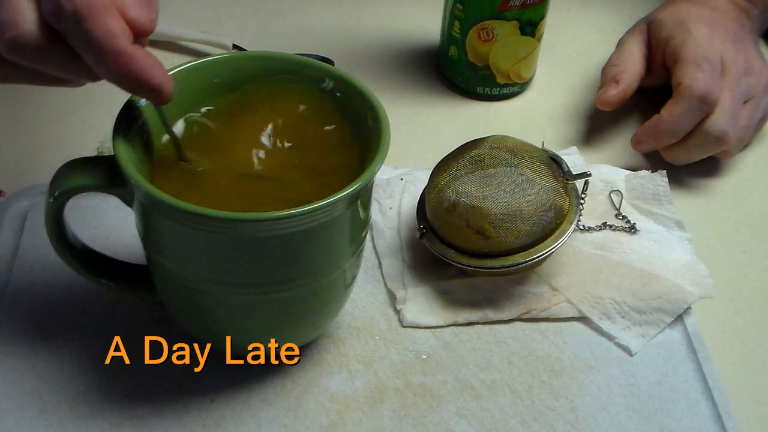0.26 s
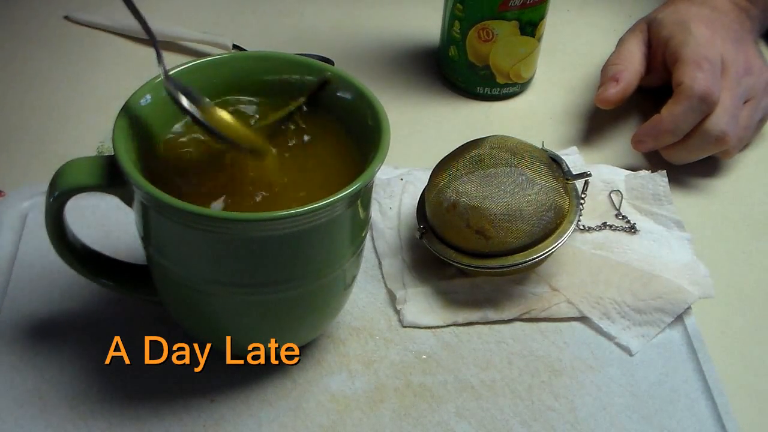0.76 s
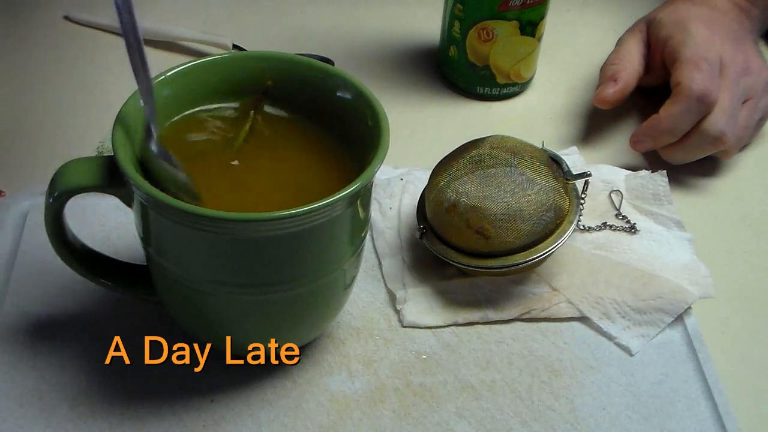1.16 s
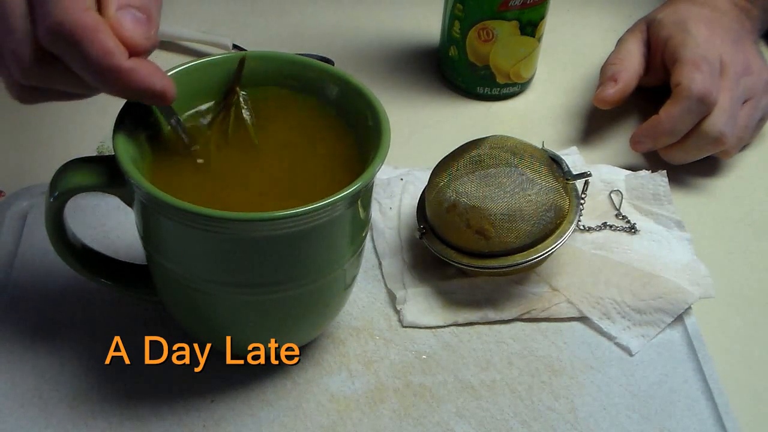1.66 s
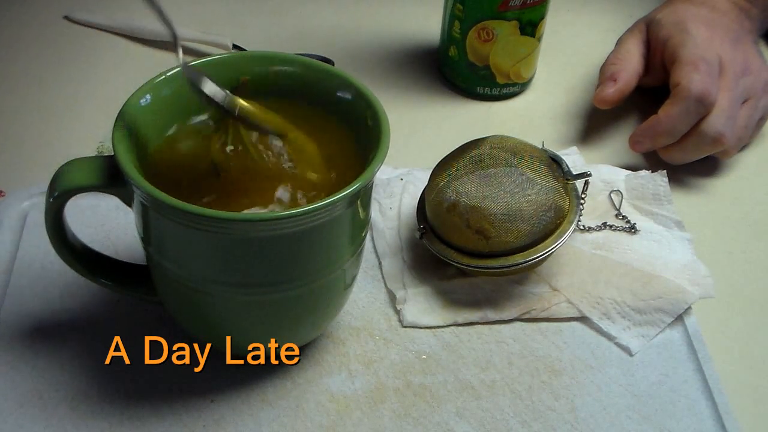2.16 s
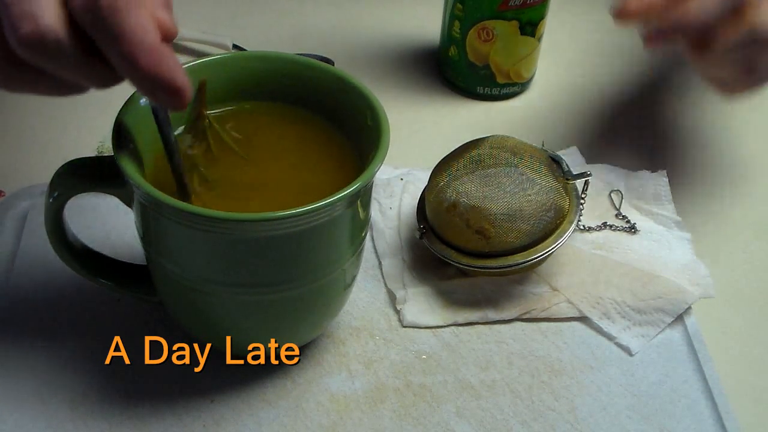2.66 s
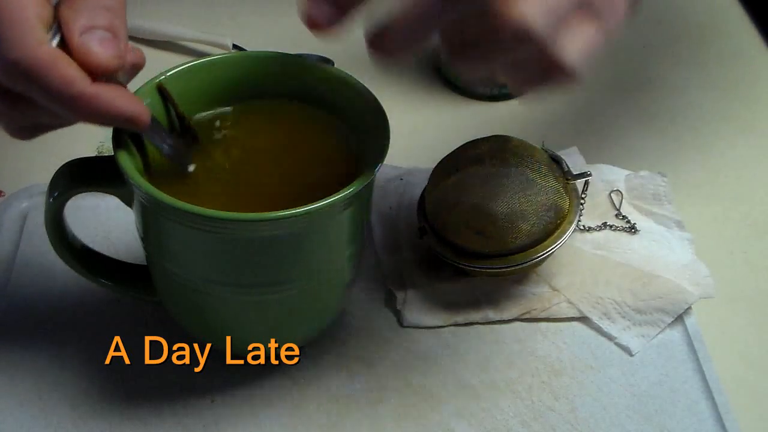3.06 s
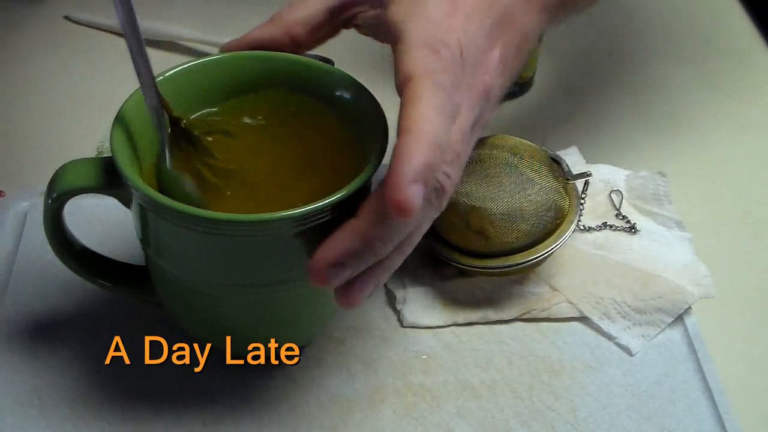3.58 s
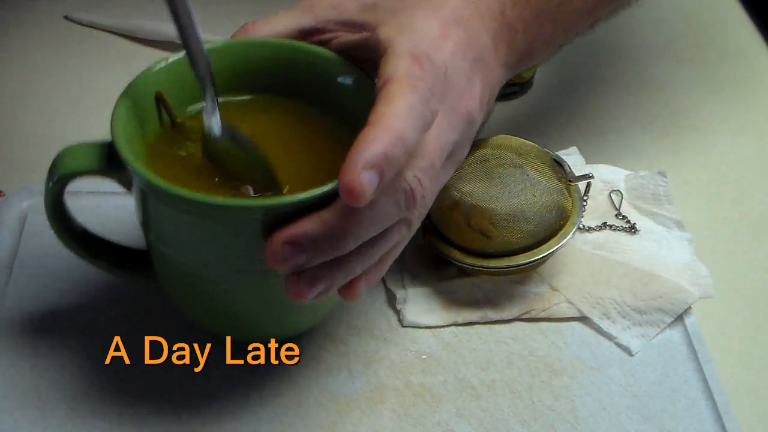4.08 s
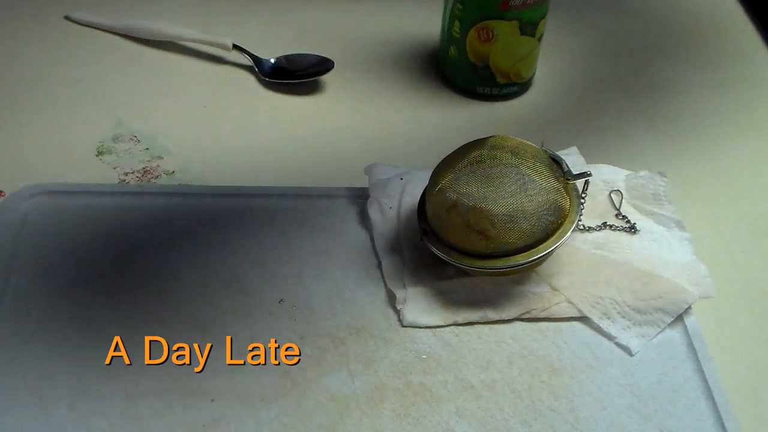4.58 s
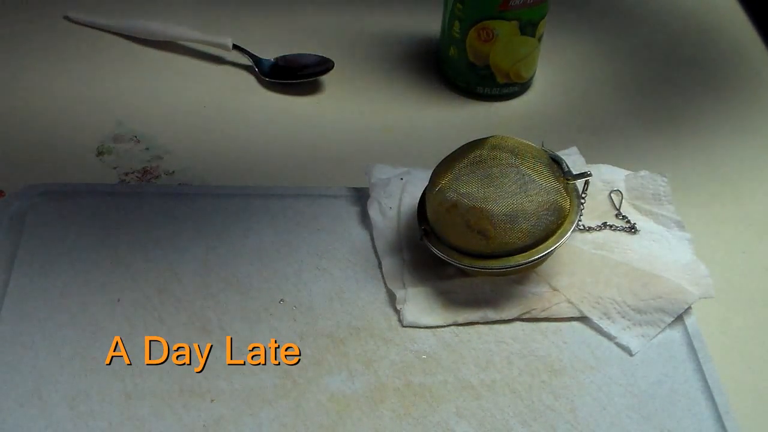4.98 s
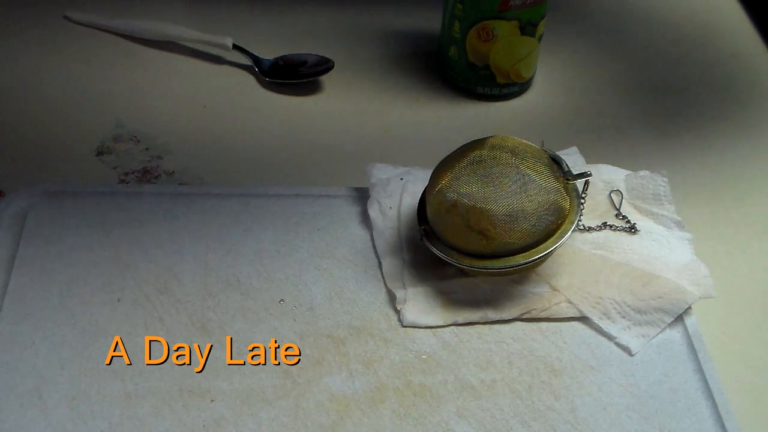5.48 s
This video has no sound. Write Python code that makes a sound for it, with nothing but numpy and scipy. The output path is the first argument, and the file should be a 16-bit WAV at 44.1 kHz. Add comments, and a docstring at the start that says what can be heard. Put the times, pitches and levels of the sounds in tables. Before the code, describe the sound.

Close in a small kitchen, a steel teaspoon softly scrapes the bottom of a ceramic mug of tea, with little watery blips. Sparse clinks ring out, then a tight cluster as the mug is lifted. After a pause the spoon hits the rim brightly and rattles briefly. Low rumble, hiss and faint hum lie underneath; a stereo microphone nearby dips in level after the hardest hits.

```python
"""On a kitchen counter, a steel teaspoon stirs tea in a ceramic mug: it scrapes and clinks, and bubbles tick.
The mug is carried off; the spoon drops against the rim and rattles. Clinks are decaying modes plus noise
bursts, scrapes are random slips through resonances, bubbles are rising sines. A small room answers, a rumble,
hiss and hum lie beneath, and a gain control ducks the sound after the hardest clinks."""
import sys
import numpy as np
from scipy import signal
from scipy.fft import rfft, irfft, next_fast_len
from scipy.io import wavfile
from scipy.ndimage import uniform_filter1d, minimum_filter1d, map_coordinates

SR = 44100
rng = np.random.default_rng(int(sys.argv[2]) if len(sys.argv) > 2 else 0)


def generate_wav(signal):
    """Clip the signal to [-1, 1] and save it as 16-bit WAV at the path in sys.argv[1]."""
    frames = np.transpose(np.atleast_2d(signal))
    scaled = np.clip(frames, -1, 1) * 32767
    pcm = np.round(scaled).astype(np.int16)
    wavfile.write(sys.argv[1], SR, pcm)


N = 252693  # length in samples

# Spoon meets mug. Each row: start in seconds, crack level in dB, hardness as spectral tilt in dB per octave,
# click level in dB, mug ring level in dB, angle from the handle in degrees, extra level of the upper mug
# rings in dB, spoon level through its bowl in dB, spoon level through its stem in dB.
CONTACTS = [ (0.001, -48, -8, -68, -80, 29, 6, -47, -79), (0.0408, -44, -5.5, -57, -77, 8.5, -12, -55, -66),
            (0.2579, -44.5, 4.5, -46, -43, 29, -38, -51, -70),
            (1.3380, -29, 1.5, -17.5, -35.5, 20, 1, -48, -60),
            (1.5624, -36.5, 1, -49, -43.5, 25, -12.5, -61, -60),
            (2.8316, -30.5, 4, -38, -38.5, 55.5, 0, -52, -60),
            (3.9538, -35.5, 6, -45, -34.5, 32, 1, -26.5, -42),
            (3.964, -26.5, 6, -40, -29, 16, -12, -36, -54), (3.9875, -24, 2.5, -27, -32, 40, -4, -22, -53),
            (4.93, -19, 5, -21, -25.5, 31, -28, -48, -25),
            (5.3564, -38, -6.5, -41, -41.5, 2, -9.5, -54.5, -75)]
# The spectrum of the crack before the tilt. Each row: frequency in Hz, relative level in dB.
CRACK_SPECTRUM = [(300, -78), (1000, -31), (1700, 18), (2400, 6), (3500, 9.5), (4700, 10.5), (6500, -3.5),
                  (8500, 7), (10000, -3), (12200, 7), (14000, -14)]
# The mug's foot. Each row: resonance in Hz, width in Hz, relative level in dB.
FOOT_MODES = [(554, 146, 2.5), (722, 170, -3), (1180, 230, 0.5)]
# The spot that is hit rings very briefly. Each row: frequency in Hz, relative level in dB, t60 in seconds.
CLICK_MODES = [(1800, -3, 0.013), (5940, -2, 0.0045), (12150, -3, 0.0098)]
# The mug's wall rings in close pairs.
# Each row: frequency in Hz, relative level in dB, t60 in seconds (ungripped), left over right in dB.
WALL_MODES = [(1700, 0, .42, 0), (1797, 0, .62, 0), (4366, -2, .38, -2.5), (4610, -3, .37, -3.5)]
# One entry for each wall mode: number of waves round the rim.
RIM_WAVES = [2, 2, 3, 3]
# The spoon's modes. Each entry: frequency in Hz.
SPOON_MODE_HZ = [1915, 3583, 4465, 4655, 4764, 5520, 5598, 7672, 7790, 8206, 8488, 8545, 8775, 8856, 9738,
                 11825, 12004, 12253]
# One row for each spoon mode: relative level in dB when struck on the bowl, the same when struck on the stem,
# t60 in seconds, left over right in dB.
SPOON_MODES = [(-64, -33, 0.23, -11), (-42, -12, 0.25, 0), (-50, -9, 0.27, -6), (-13.5, -32, 0.25, -7),
               (-28, -32, 0.36, 2), (-70, -5, 0.23, -7), (-1.5, -4.5, 0.18, -1), (-19.5, -32, 0.36, -13),
               (-16, -47, 0.24, 11), (-38, -15, 0.32, 1), (-13, -16, 0.14, 14), (-18, -25, 0.12, -19),
               (-18.5, -23, 0.073, 17), (-11.5, -9, 0.18, -2), (-18, -6, 0.12, -1), (-22, -26, 0.15, 6),
               (-24, -27, 0.11, 10), (-31, 4, 0.083, -3)]
# Short dull bursts of noise: light touches, and the coloured onsets of some clinks.
# Each row: start in seconds, level in dB at onset, centre in Hz.
DULL_BURSTS = [(0.0397, -44.5, 3300), (0.111, -47, 6340), (1.257, -44.5, 2210), (1.562, -36.5, 3800),
               (2.7803, -46, 1630), (3.459, -50.5, 1800), (3.8785, -53.5, 4680), (3.965, -28, 4200),
               (4.494, -42, 1880), (5.3556, -42.5, 2100), (5.3705, -51, 2400), (5.480, -55, 930)]
# The mug's rings while the spoon leans on it.
# Each row: mean frequency in Hz, mean relative level in dB, t60 in seconds.
LEANING_MODES = [(1670, -4, 0.17), (1800, 1.5, 0.086), (1885, -1.5, 0.057), (3800, -13, 0.062)]
# Sweeps over the mug's bottom. Each row: time of firmest pressure in seconds, relative level in dB,
# swell in seconds, pitch of the rub in Hz.
SWEEPS = [(0.075, -54, 0.069, 2670), (0.187, -59, 0.021, 3900), (0.379, -53, 0.043, 3000),
          (0.488, -63, 0.021, 3900), (0.592, -58, 0.048, 1920), (1.73, -61, 0.036, 2110),
          (1.85, -72, 0.01, 1200), (1.97, -56, 0.027, 1350), (3.12, -63, 0.073, 1210)]
# The mug's bottom. Each row: resonance in Hz, width in Hz, mean relative level in dB.
BOTTOM_MODES = [(579, 97, 5), (1270, 65, 1.5), (1630, 216, -2.5), (1990, 235, -1), (3825, 370, -4.5),
                (5350, 320, -9), (7700, 2400, -13.5)]
# Short rising tones: bubbles, drips and the 2 kHz swish of two sweeps.
# Each row: start in seconds, level in dB, starting pitch in Hz, t60 in seconds.
RISING_TONES = [(0.064, -49, 3650, 0.052), (0.1097, -38.5, 1430, 0.035), (0.163, -43, 1487, 0.049),
                (0.207, -49.5, 3670, 0.044), (0.582, -45.5, 1990, 0.072), (1.715, -50, 2050, 0.098),
                (2.4621, -40, 3190, 0.024), (3.881, -51, 1500, 0.068)]
# Soft bumps on the counter. Each row: centre in seconds, relative level in dB, spread in seconds.
HAND_BUMPS = [(2.84, -57, 0.056), (3.88, -59.5, 0.031), (3.992, -53.5, 0.04)]
# The room's decay. Each row: frequency in Hz, t60 in seconds.
ROOM_DECAY = [(300, 1), (2000, 0.62), (6000, 0.55), (13000, 0.31)]
# Steady noise before its low cut. Each row: frequency in Hz, relative level in dB per Hz.
FLOOR_SPECTRUM = [(12, -24), (20, -13), (39, -5.5), (71, -13.5), (86, -16), (114, -14.5), (145, -20),
                  (351, -24), (561, -27), (1740, -30.5), (2550, -32), (2780, -31), (3100, -32.5),
                  (13300, -36.5), (14500, -35)]
# Likeness of the two ears in that noise. Each row: frequency in Hz, left-right correlation from 0 to 1.
EAR_LIKENESS = [(60, 0.18), (180, 0.28), (540, 0.078), (1630, 0.18), (4880, 0.011), (14700, 0.01)]
# A kitchen appliance. Each row: frequency in Hz, mean level in dB.
APPLIANCE_HUM = [(29.8, -57), (59.5, -68.5)]

KNOCK_DB = -8  # the knock against the crack, for an untilted blow
KNOCK_LOSS = 1.1  # dB lost per dB/octave of tilt, so hard blows knock less
LIFT_S, LIFTED_KNOCK_DB = 4.3, -21.5  # the mug leaves the counter and its knock weakens
GRIP_FROM_S, GRIP_DAMPING = 3.5, 0.61  # in the hand, the mug's lowest rings last only this share as long
RATTLE_S, RATTLE_DB, RATTLE_FADE_DB_PER_S = 5.357, -43.5, 68
ROCK_S, ROCK_SCATTER_S = 0.0205, 0.004  # from one bounce to the next, and its random spread
EASE_SHARE, PRESS_EDGE = 0.52, 1.85  # a sweep lets go in this share of its swell; steepness of its flanks
RUB_FALL_DB_PER_OCT = 4  # a sweep excites less the farther from its pitch
LAP_FROM_S, LAP_TO_S = 0.9, 3.9
LAP_DB, LAP_HZ = -59, 2900  # loudest tick and middle pitch
TOP_HZ = 14050  # upper band limit


def amp(db):
    """Amplitude ratio that corresponds to a level in decibels."""
    return 10 ** (np.asarray(db) / 20)


def unit(x):
    """Normalization to unit root-mean-square."""
    return x / np.sqrt(np.mean(x ** 2) + 1e-20)


def along(points, hz):
    """Linear interpolation of (Hz, value) points on a logarithmic frequency axis."""
    f, v = np.transpose(points)
    return np.interp(np.log(hz + 1), np.log(f + 1), v)


def filtered(x, response):
    """Linear filtering: the spectrum is multiplied by a complex response of frequency."""
    n = x.shape[-1]
    m = next_fast_len(n + 8192)
    return irfft(rfft(x, m) * response(np.fft.rfftfreq(m, 1 / SR)), m)[..., :n]


def resonance(hz, centre, width):
    """Frequency response of one damped, causal resonator."""
    return 1j * hz * width / (centre ** 2 - hz ** 2 + 1j * hz * width)


def wobble(rate):
    """Slow random fluctuation: a smooth curve through a given number of random knots a second."""
    return map_coordinates(rng.standard_normal(int(N * rate / SR) + 4), [np.arange(N) * rate / SR])


def noise(size, colour, width):
    """Coloured stereo noise of unit rms; width weighs the side against the mid signal."""
    mid, side = filtered(rng.standard_normal((2, size)), colour)
    return unit(np.array([mid + width * side, mid - width * side]))


def add(track, s, sound):
    """Superposition: a sound is added to the stereo track from time s."""
    start = max(round(s * SR), 0)
    track[:, start:start + sound.shape[-1]] += sound[..., :N - start]


def strikes():
    """Impact excitation: a click, a crack of dense short modes and a knock through the counter."""
    out, t = np.zeros((2, N)), np.arange(SR // 3) / SR

    def foot(hz):
        return sum(amp(db) * resonance(hz, centre, width) for centre, width, db in FOOT_MODES)

    for s, crack_db, tilt_db, click_db, *_ in CONTACTS:
        def colour(hz):
            return amp(along(CRACK_SPECTRUM, hz) + tilt_db * np.log2((hz + 500) / 5000))

        # the crack comes straight from the mug; its faint tail is scattered by the things on the counter
        crack = noise(len(t), colour, width=0.2) * amp(-60 * t / 0.045)
        scatter = noise(len(t), colour, width=0.34) * amp(-15.5 - 60 * t / 0.27)
        add(out, s, amp(crack_db) * (crack + scatter))
        knock_db = crack_db + KNOCK_DB - KNOCK_LOSS * tilt_db + LIFTED_KNOCK_DB * (s > LIFT_S)
        knock = noise(len(t), foot, width=0.17) * amp(-60 * t / 0.065)
        add(out, s, amp(knock_db) * knock)
        click = sum(amp(db - 60 * t / t60) * np.cos(2 * np.pi * hz * t) for hz, db, t60 in CLICK_MODES)
        add(out, s, amp(click_db) * click)
    return out


def ring(t, hz, t60, pan_db, attack=0.00053):
    """Exponentially decaying mode; a close companion tone makes it beat, as tea and spoon move."""
    ears = np.array([[.5], [-.5]])
    # the phase between the ears grows with frequency
    phase = rng.uniform(0, 2 * np.pi) + ears * hz / 8000 * rng.choice([-1, 1])
    beat_hz = np.sqrt(hz) * rng.uniform(0.12, 0.37) * rng.choice([-1, 1])
    companion_phase = phase + rng.uniform(0, 2 * np.pi)
    companion = np.sin(2 * np.pi * (hz + beat_hz) * t + companion_phase)
    tone = np.sin(2 * np.pi * hz * t + phase) + 0.41 * (1 - np.exp(-t / 0.0026)) * companion
    return amp(ears * pan_db - 60 * t / t60) * tone * (1 - np.exp(-t / attack))


def rings():
    """Modal superposition: every contact excites the modes of the mug's wall and of the spoon."""
    out, t = np.zeros((2, N)), np.arange(SR * 3 // 4) / SR
    for s, *_, mug_db, angle, upper_db, bowl_db, stem_db in CONTACTS:
        for k, ((hz, db, t60, pan_db), waves) in enumerate(zip(WALL_MODES, RIM_WAVES)):
            # the place of the blow shares the energy between the twins of a pair
            share = np.cos(waves * np.radians(angle) - k % 2 * np.pi / 2)
            life = t60 * (GRIP_DAMPING if s > GRIP_FROM_S and waves == 2 else 1)
            level = share * amp(mug_db + db + upper_db * (waves > 2))
            add(out, s, level * ring(t[t < life], hz, life, pan_db))
        for hz, (on_bowl_db, on_stem_db, t60, pan_db) in zip(SPOON_MODE_HZ, SPOON_MODES):
            level = np.hypot(amp(bowl_db + on_bowl_db), amp(stem_db + on_stem_db))
            add(out, s, level * ring(t[t < t60], hz, t60, pan_db))
    return out


def dull_bursts():
    """Heavily damped resonance: a brief burst of noise in one broad band, for touches and clink onsets."""
    out, t = np.zeros((2, N)), np.arange(SR // 8) / SR
    for s, db, centre_hz in DULL_BURSTS:
        burst = noise(len(t), lambda hz: resonance(hz, centre_hz, 0.51 * centre_hz), width=0.44)
        add(out, s, amp(db) * burst * amp(-60 * t / 0.03))
    return out


def rattle(count=18):
    """Repeated impact with energy loss: the loose spoon rocks on the rim, whose few modes it damps."""
    out, t = np.zeros((2, N)), np.arange(SR // 3) / SR
    for k in range(count):
        since = k * ROCK_S + (k > 0) * ROCK_SCATTER_S * rng.standard_normal()
        db = RATTLE_DB - RATTLE_FADE_DB_PER_S * since
        for hz, mode_db, t60 in LEANING_MODES:
            pitch = hz * (1 + rng.normal(0, 0.011))
            level = amp(db + mode_db + rng.normal(0, 2.4))
            add(out, RATTLE_S + since, level * ring(t, pitch, t60, 0, attack=0.00073))
    return out


def pressure(t, s, swell):
    """Contact force of one sweep, 0-1: it builds up to time s and lets go faster."""
    flank = np.where(t < s, swell, EASE_SHARE * swell)
    return 1 / (1 + np.abs((t - s) / flank) ** PRESS_EDGE)


def scrape():
    """Friction: tiny random slips of steel on glaze excite the mug's bottom and its lowest rings."""
    t = np.arange(N) / SR
    sweeps = np.array([amp(db) * pressure(t, s, swell) for s, db, swell, _ in SWEEPS])
    rub_hz = np.array(SWEEPS)[:, -1]

    def force(hz):
        return amp(-RUB_FALL_DB_PER_OCT * np.abs(np.log2(hz / rub_hz))) @ sweeps

    slips = (rng.random(N) < 5000 / SR) * rng.standard_normal((2, N))  # about 5000 a second
    # as the spoon travels, the resonances of the bottom swell and fade independently
    parts = []
    for k, (centre, width, db) in enumerate(BOTTOM_MODES):
        level = amp(db + 1.64 * wobble(12))
        parts.append(level * filtered(slips, lambda hz: (-1) ** k * resonance(hz, centre, width)))
    body = sum(part * force(centre) for part, (centre, *_) in zip(parts, BOTTOM_MODES))
    mid, side = body / np.std(sum(parts)) * amp([[4], [-9]])
    for (hz, _, t60, _), drive_db in zip(WALL_MODES, [-1, 5.5]):
        # a ring gathers the energy of the slips and loses it at its own rate
        keep = amp(-120 / (t60 * SR))
        energy = signal.lfilter([1 - keep], [1, -keep], force(hz) ** 2)
        tone = np.sin(2 * np.pi * hz * t + 1.7 * wobble(9.5))
        mid = mid + amp(drive_db) * np.sqrt(energy) * tone
    return np.array([mid + side, mid - side])


def bubble(db, hz, t60):
    """Volume oscillation of a gas bubble: a sine that rises a little in pitch as it dies."""
    t = np.arange(SR // 10) / SR
    tone = np.sin(2 * np.pi * hz * (t + 0.074 * t * t / t60))
    return amp(db - 60 * t / t60) * tone * (1 - np.exp(-t / 0.000091))


def rising_tones(count=5):
    """Damped rising sines: bubbles, drips and two swishes, and small bubbles around each sweep."""
    out = np.zeros((2, N))
    for s, db, hz, t60 in RISING_TONES:
        add(out, s, bubble(db, hz, t60))
    for s, db, swell, _ in SWEEPS:
        for when, pitch, size in rng.random((count, 3)):
            small = bubble(db + 5.5 - 12 * size, 1150 * 2.1 ** pitch, t60=0.032)
            add(out, s + swell * (2 * when - 1), small)
    return out


def lapping(count=12):
    """Independent random events: tiny bubbles tick while the swirling tea laps at the wall."""
    out = np.zeros((2, N))
    for when, pitch, size in rng.random((count, 3)):
        tick = bubble(LAP_DB - 6 * size, LAP_HZ * 1.3 ** (pitch - .5), t60=0.04)
        add(out, LAP_FROM_S + when * (LAP_TO_S - LAP_FROM_S), tick)
    return out


def bumps():
    """Low resonance under slow force: hands and mug shift on the counter with a dull rumble."""
    t = np.arange(N) / SR
    level = sum(amp(db) * np.exp(-.5 * ((t - s) / spread) ** 2) for s, db, spread in HAND_BUMPS)
    return level * noise(N, lambda hz: resonance(hz, 125, 72), width=0.15)


def room(x):
    """Reverberation: convolution with noise that decays faster at high frequency, different in each ear."""
    hz, t, z = signal.stft(rng.standard_normal((2, SR // 2)), SR, nperseg=256)
    decay = amp(-60 * t / along(ROOM_DECAY, hz)[:, None])
    tail = signal.istft(z * decay, SR, nperseg=256)[1]
    return signal.fftconvolve(x, tail / np.linalg.norm(tail[0]), axes=1)[:, :N]


def background():
    """Stationary noise of partly correlated ears, heard as rumble and hiss, with an unsteady hum."""
    t = np.arange(N) / SR

    def colour(hz):
        # the angle between mid and side sets the likeness of the ears
        turn = np.arccos(np.clip(along(EAR_LIKENESS, hz), -1, 1)) / 2
        low_cut = hz / np.hypot(hz, 45)
        return amp(along(FLOOR_SPECTRUM, hz)) * low_cut * np.array([np.cos(turn), np.sin(turn)])

    hum = 0
    for hz, db in APPLIANCE_HUM:
        level = amp(db + 0.84 * wobble(2.53)) * np.sqrt(2)
        hum = hum + level * np.sin(2 * np.pi * hz * t + .5 * wobble(13))
    return amp(-57.0) * noise(N, colour, width=1.0) + hum


def scene():
    """Superposition of direct sound, reverberation and background; the lowest rings come back weakest."""
    tones = rings() + rattle() + scrape()
    blows = strikes() + dull_bursts() + rising_tones() + lapping() + bumps()
    spread = filtered(tones, lambda hz: hz / np.hypot(hz, 4000))
    return tones + blows + room(amp(-11.5) * spread + amp(-10.5) * blows) + background()


def record(dry):
    """Automatic gain control: it pulls down just after a peak, holds and lets go; then a band limit."""
    level = np.sqrt(np.abs(uniform_filter1d(np.mean(dry ** 2, axis=0), size=45)))
    needed = np.minimum(1, amp(-23) / (level + 1e-9))
    hold = 2 * int(.175 * SR) + 1  # samples, about 0.35 s
    # the shifted origins let each filter look back only
    held = minimum_filter1d(needed, hold, origin=hold // 2, mode="nearest")
    recovery = uniform_filter1d(held, size=3001, origin=3001 // 2, mode="nearest")
    released = np.minimum(held, recovery)
    gain = uniform_filter1d(released, size=301, origin=301 // 2, mode="nearest")
    return filtered(dry * gain, lambda hz: 1 / np.sqrt(1 + (hz / TOP_HZ) ** 170))


dry = scene()
out = record(dry)
generate_wav(out)
```